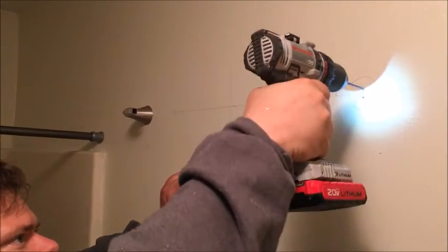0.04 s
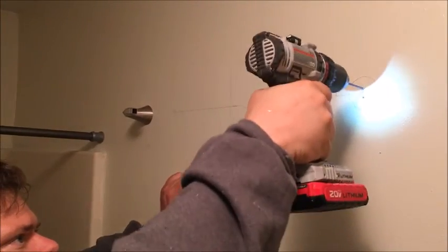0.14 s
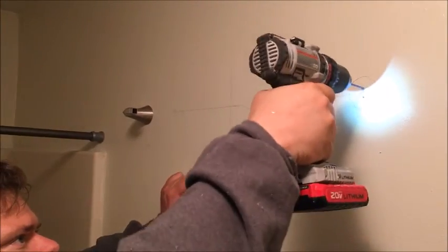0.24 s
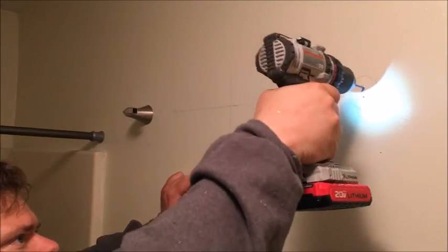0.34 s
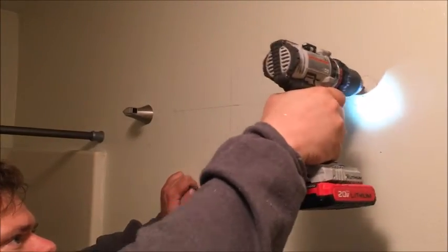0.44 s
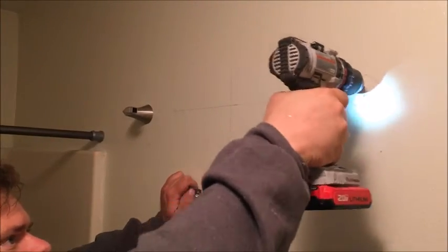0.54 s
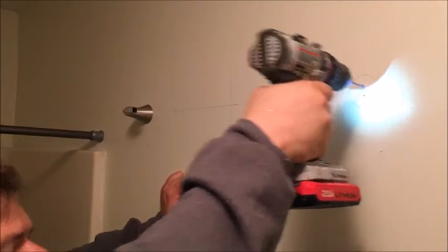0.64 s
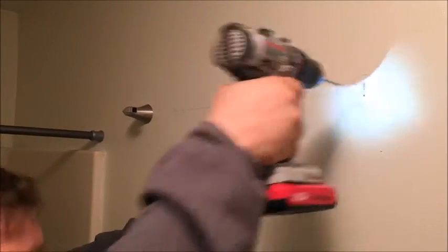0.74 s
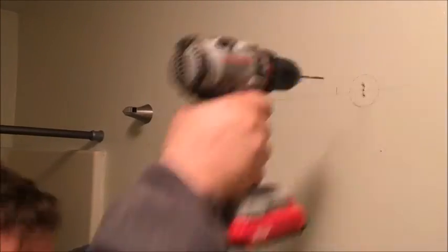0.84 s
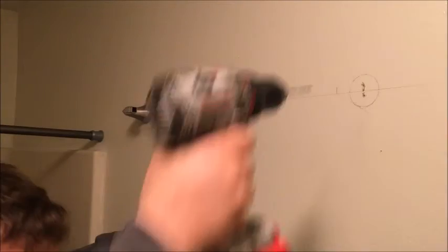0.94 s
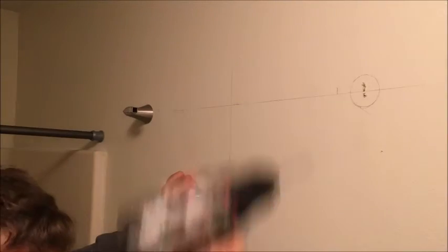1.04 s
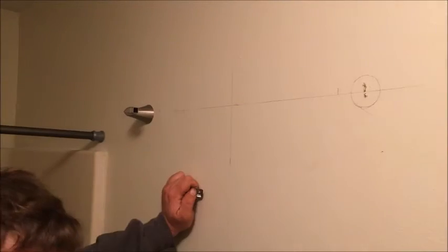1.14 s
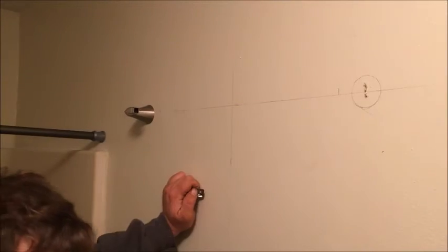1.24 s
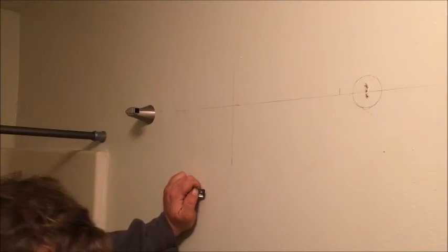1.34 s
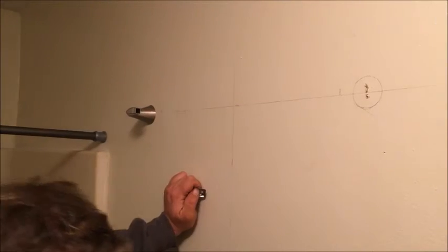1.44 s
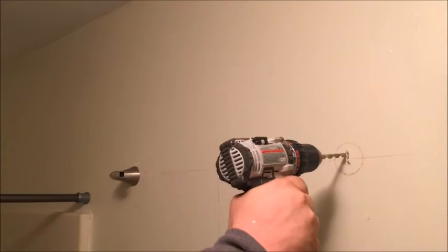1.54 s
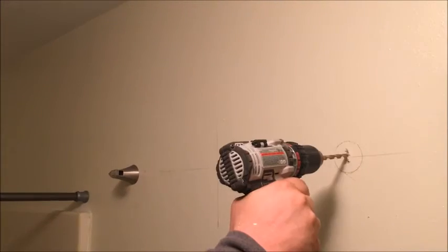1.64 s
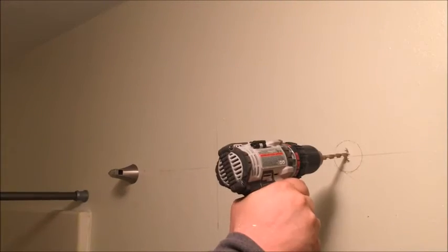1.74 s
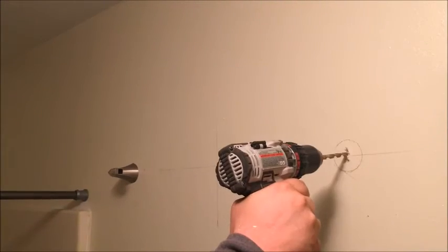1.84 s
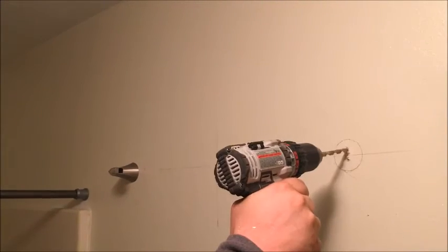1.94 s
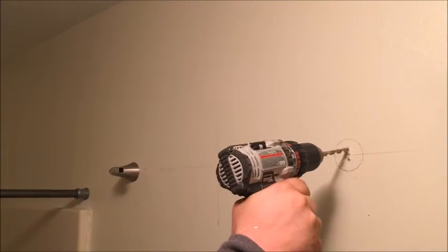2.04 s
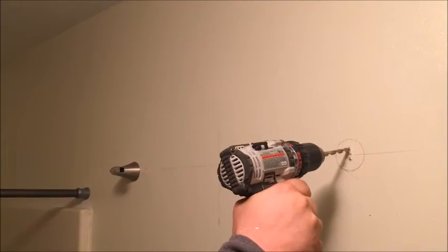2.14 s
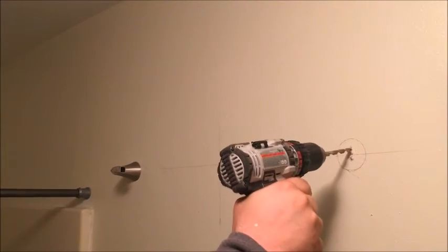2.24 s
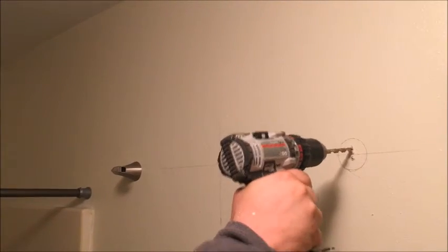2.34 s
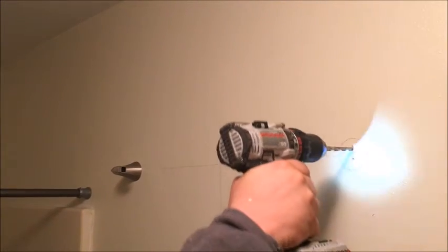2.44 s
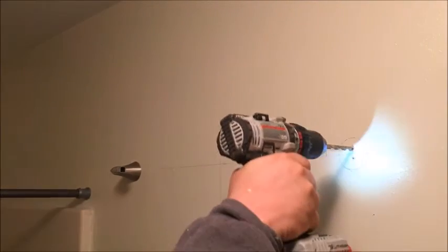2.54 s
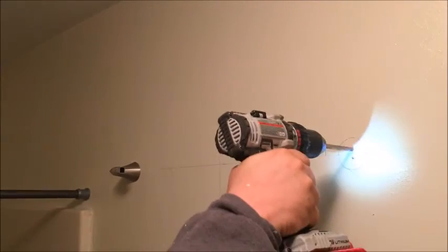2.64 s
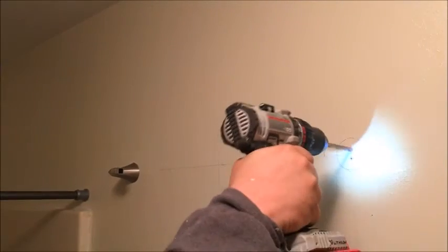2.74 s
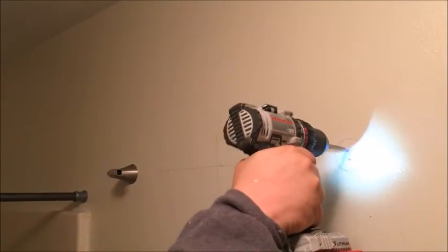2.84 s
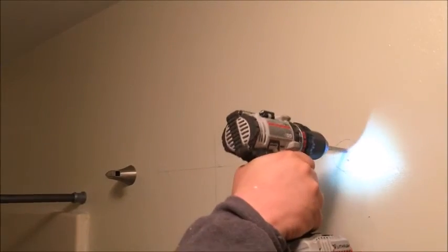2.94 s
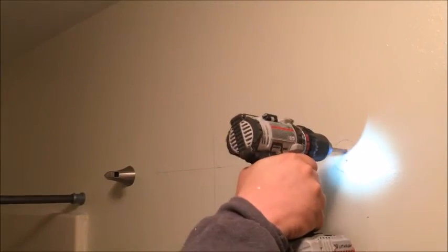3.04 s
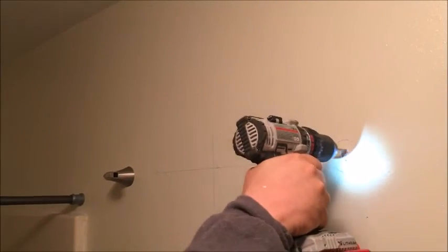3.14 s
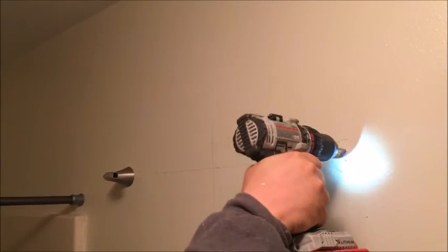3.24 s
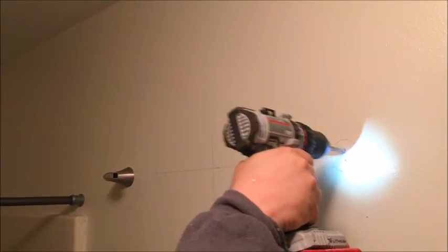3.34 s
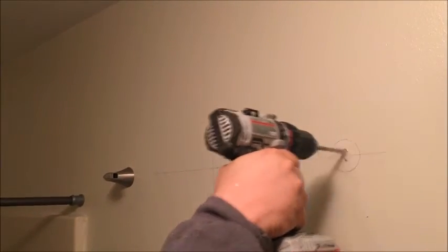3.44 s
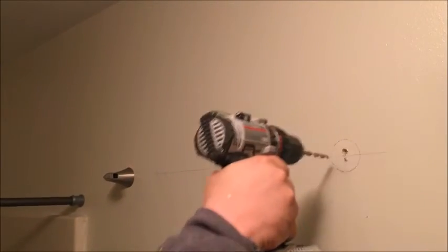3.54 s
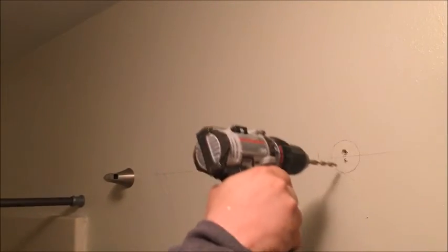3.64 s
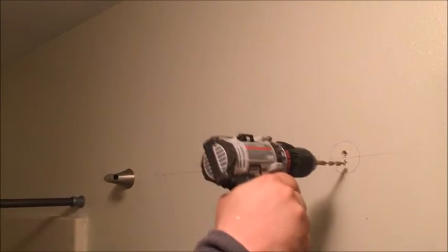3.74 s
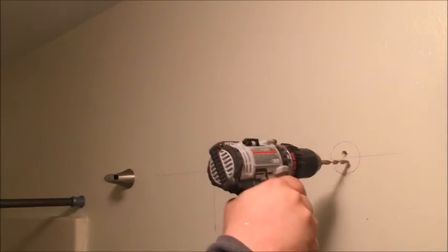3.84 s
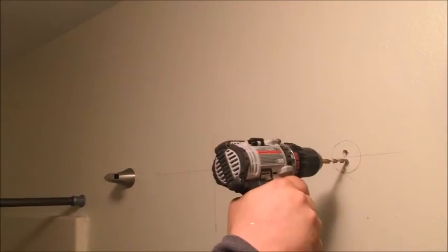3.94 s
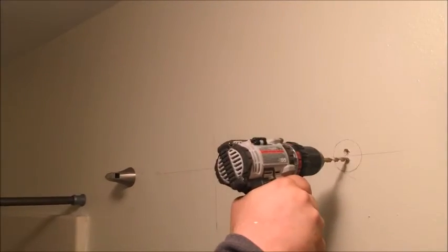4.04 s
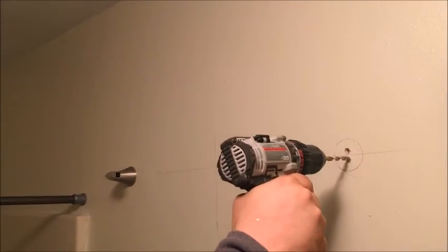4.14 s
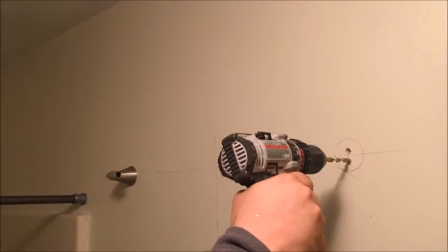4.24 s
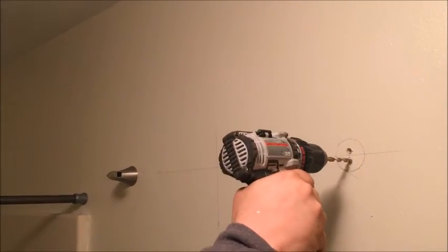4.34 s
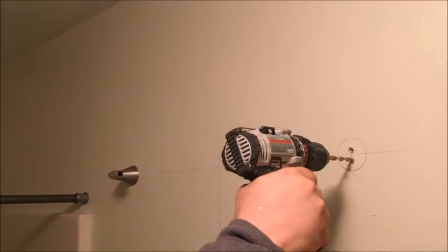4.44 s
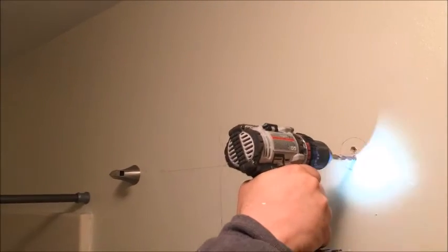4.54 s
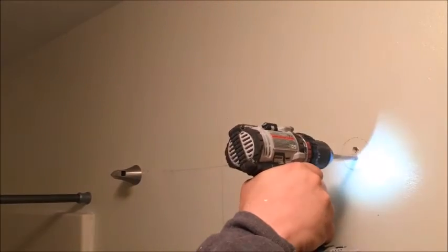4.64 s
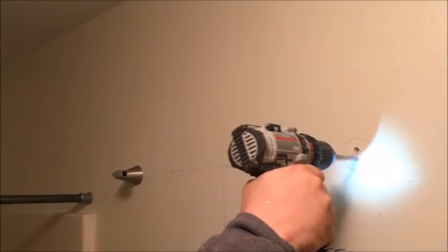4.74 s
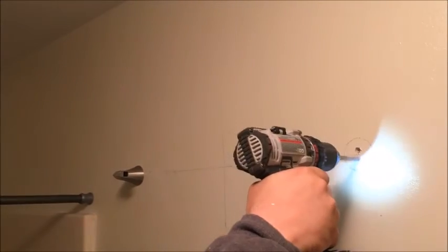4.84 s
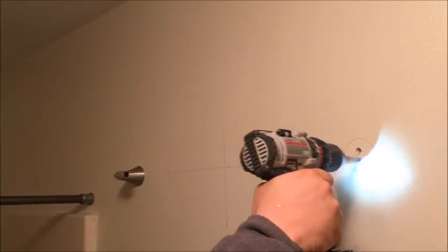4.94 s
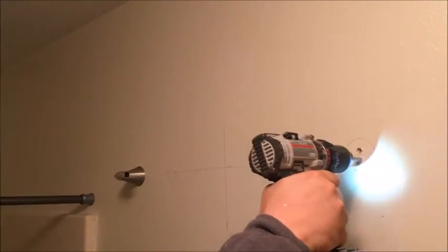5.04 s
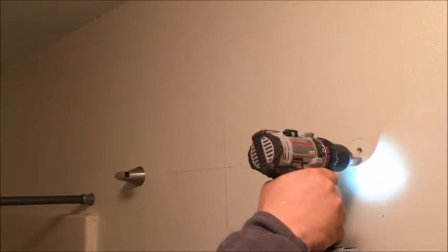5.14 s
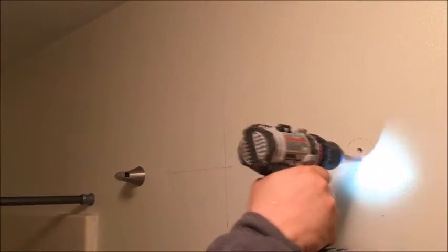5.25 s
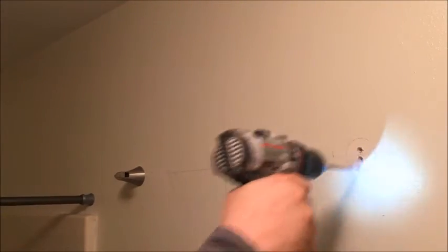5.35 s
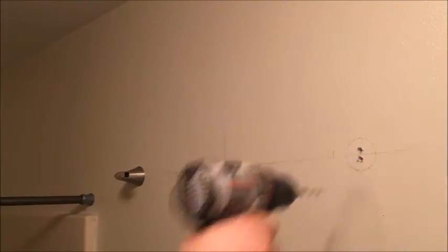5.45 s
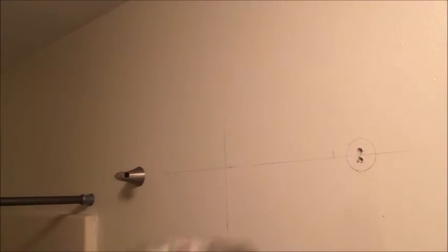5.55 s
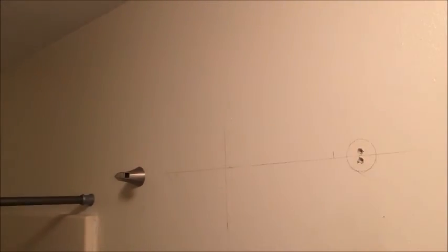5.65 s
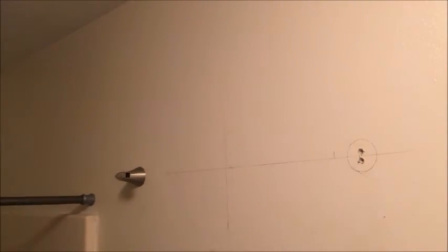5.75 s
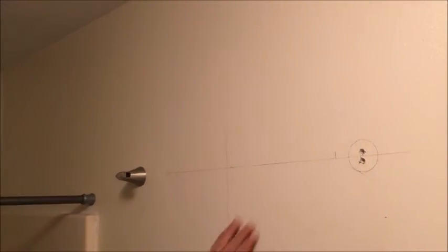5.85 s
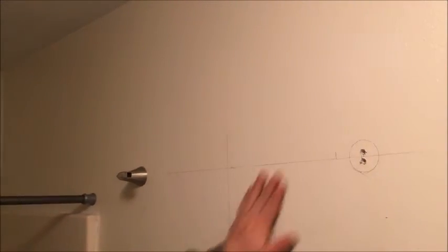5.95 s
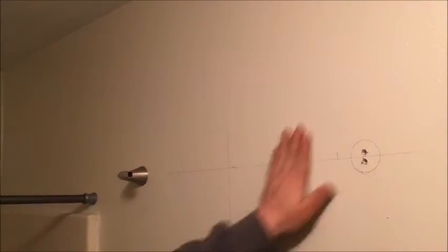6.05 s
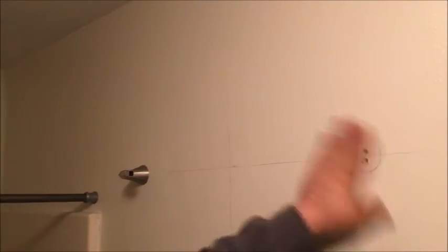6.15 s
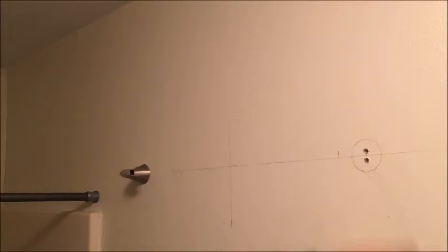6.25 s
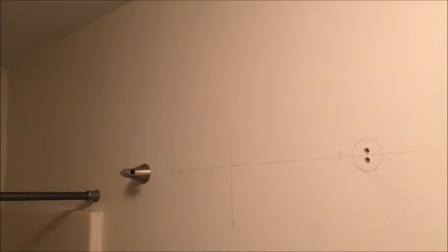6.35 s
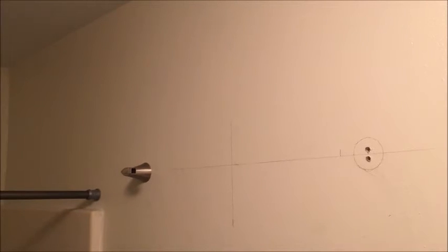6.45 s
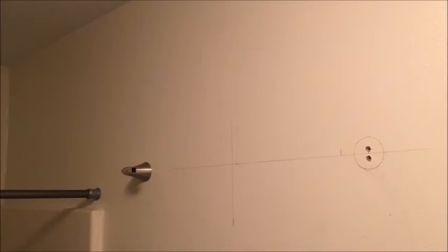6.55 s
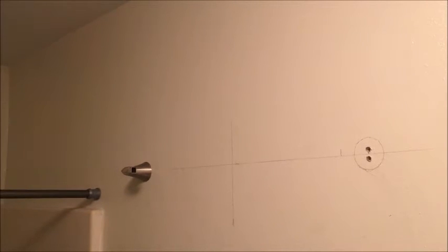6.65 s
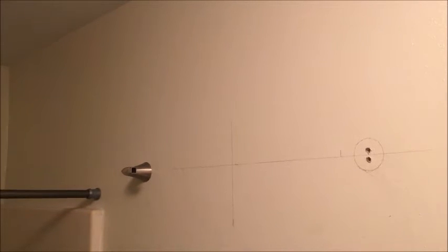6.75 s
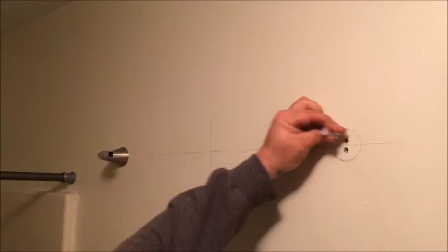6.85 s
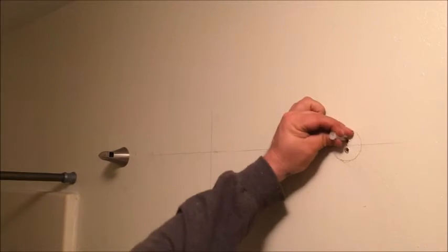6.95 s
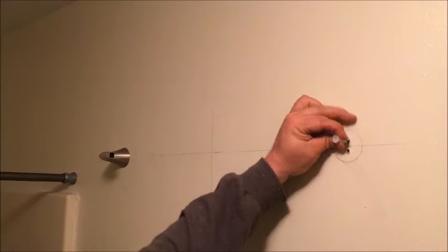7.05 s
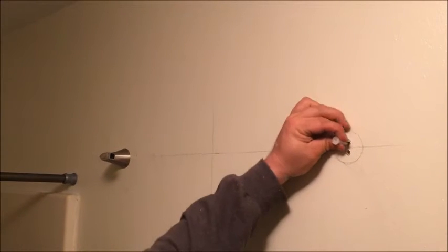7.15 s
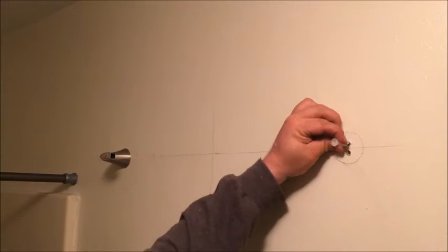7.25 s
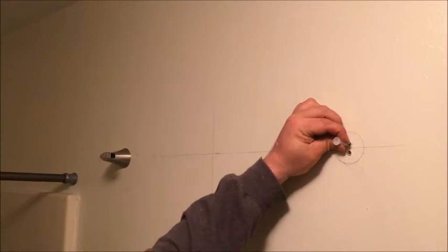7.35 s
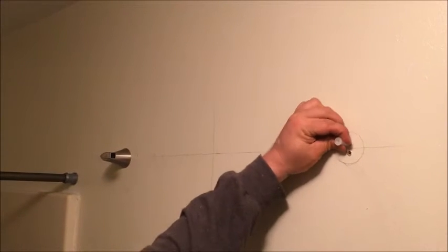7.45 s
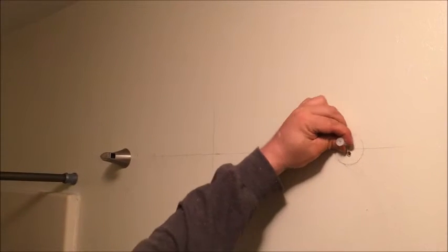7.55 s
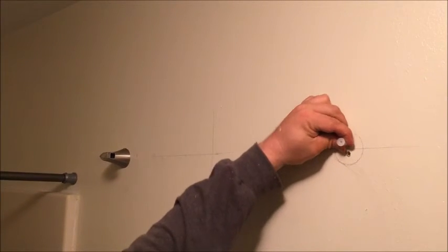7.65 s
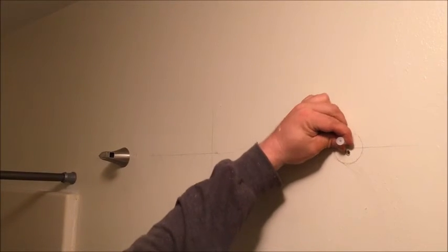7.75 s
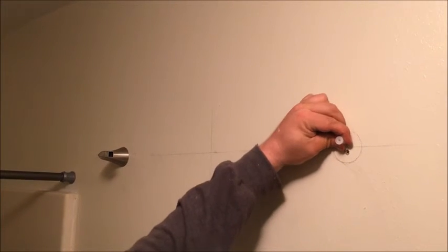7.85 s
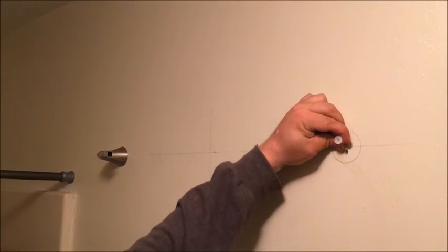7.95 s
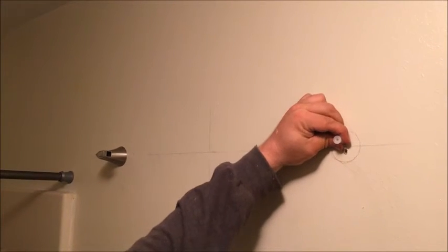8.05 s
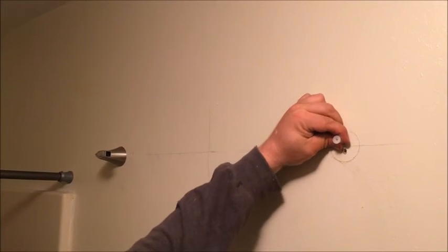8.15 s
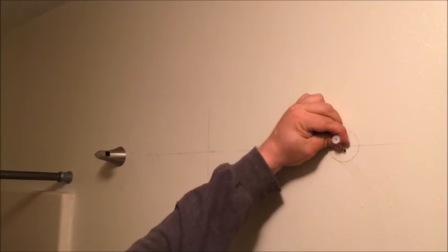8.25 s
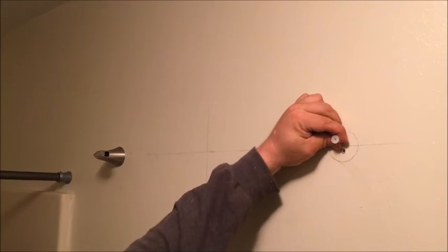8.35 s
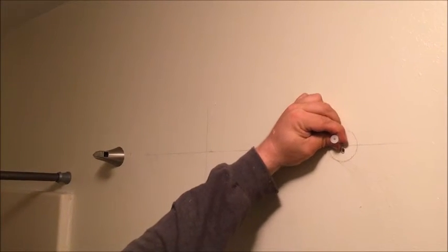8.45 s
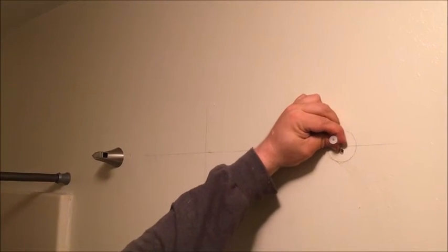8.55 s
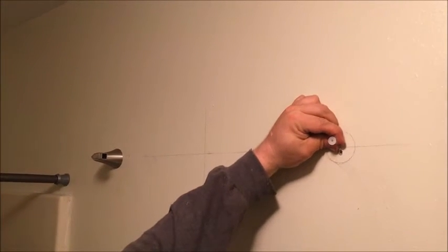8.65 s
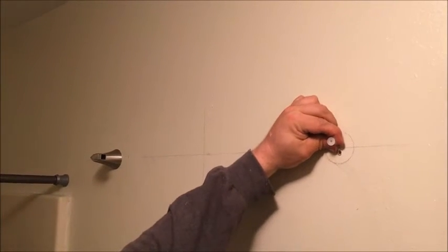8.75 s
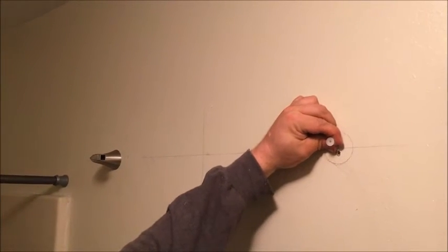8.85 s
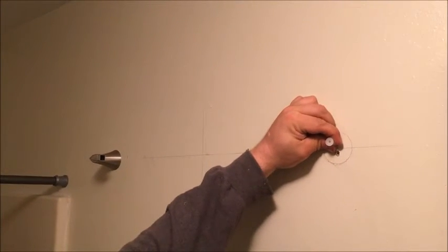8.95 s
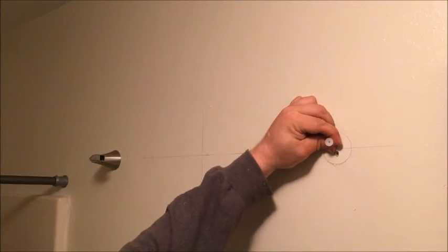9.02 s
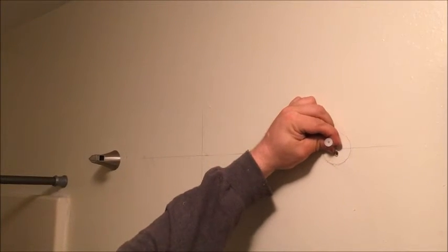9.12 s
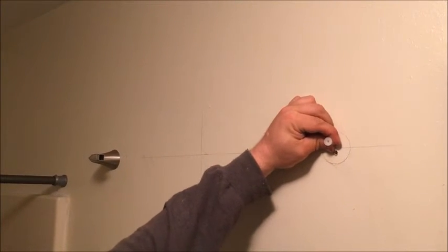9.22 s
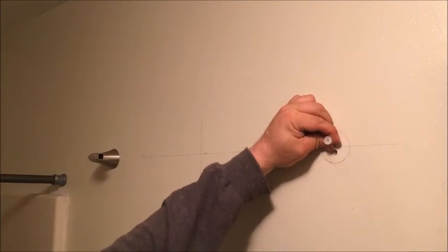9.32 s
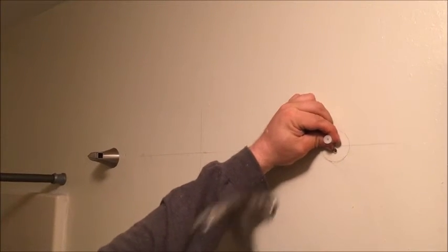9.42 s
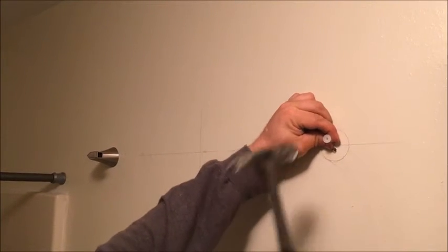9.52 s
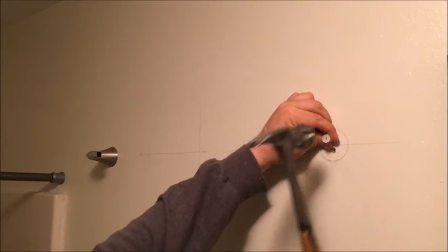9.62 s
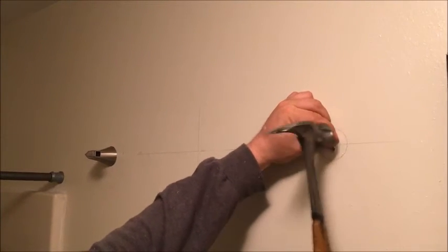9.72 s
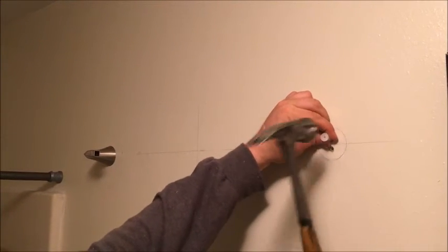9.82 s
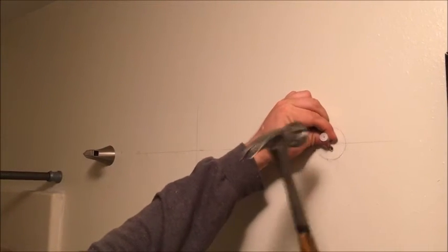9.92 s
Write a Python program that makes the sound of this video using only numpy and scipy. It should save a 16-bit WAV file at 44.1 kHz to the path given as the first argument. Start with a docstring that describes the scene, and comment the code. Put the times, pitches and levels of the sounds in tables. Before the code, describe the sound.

A cordless drill bores into hollow wall board for the first second, a wavering whine over gritty rasping, and stops with a clack of gears. The bit taps the wall lightly around 2 seconds. A second burst runs from 2.6 to 3.5 seconds, and after more faint taps a third from 4.7 to 5.5, both clacking at start and stop while the wall rumbles. Around 6 seconds a hand sweeps dust off the wall. The sound cuts out for an instant near 6.9. From 7 seconds fingers press in a plastic anchor with quiet rubs and dull bumps, a short squeak near 8 and a sharp click at 8.7. At 9.8 a hammer lands one loud blow that makes the wall boom. Everything sounds close, with the short echo of a small tiled bathroom over faint hiss and mains hum.

```python
"""A cordless drill bores three holes in hollow wall board in a small tiled bathroom.
Its tones follow the motor speed over the rasp of gears and bit; the gears clack at start and stop.
Between holes the bit taps the wall, a hand wipes the dust off and fingers press in a squeaking
plastic anchor; a hammer lands the first blow. The hollow wall booms under every touch.
Faint hiss and mains hum lie underneath; the sound cuts out once, briefly."""
import sys
import numpy as np
from scipy import signal
from scipy.fft import rfft, irfft, next_fast_len
from scipy.io import wavfile
from scipy.ndimage import uniform_filter1d

SR = 44100
rng = np.random.default_rng(int(sys.argv[2]) if len(sys.argv) > 2 else 0)


def int16_out(signal):
    """Quantize to a 16-bit WAV file."""
    q = np.round(np.clip(np.atleast_2d(signal).T, -1, 1) * 32767)
    wavfile.write(sys.argv[1], SR, q.astype(np.int16))


N = 440118
T = np.arange(N) / SR

# per hole: t/s, rasp level/dB, hiss/dB re rasp, growl/dB re rasp
BORING = [
    [(0.0, -28, -3.5, -16), (0.074, -28, -10.5, -17), (0.12, -26.5, 0, -11.5), (0.272, -22, -1.5, -12.5),
     (0.492, -24, -1.5, -15.5), (0.718, -25, 0, -15.5), (0.892, -24.5, -1, -21), (0.91, -18.5, 5.5, -17),
     (0.942, -17.5, -10, -18.5), (0.96, -18, -9.5, -13)],
    [(2.632, -17.5, -11.5, -5.5), (2.688, -25, -0.5, -8), (2.79, -21, -3, -2.5), (3.008, -24, -2, -12.5),
     (3.226, -23.5, -1.5, -12.5), (3.514, -23, -2, -12), (3.57, -25, -8, -3.5)],
    [(4.667, -17, -11, -15), (4.703, -22, -4.5, -7), (4.775, -22.5, 0, -3.5), (4.957, -23.5, -1.5, -10),
     (5.287, -23, -1, -12), (5.445, -24, -2, -8), (5.459, -19, 2, -21.5), (5.491, -16.5, -1, -20),
     (5.515, -29.5, -3, -14)],
]
RUMBLE_DB = (-9.5, -6, -5)  # per hole, re growl
def drill():
    """Three bursts of speed-locked tones over the rasp of gears and bit; returns (whine, grinding)."""
    whine, grinding = np.zeros((2, N))
    for hole, rows in enumerate(BORING):
        t, (rasp_db, hiss_db, growl_db) = curves(rows)
        turns, tone_gain = motor(t, hole)
        add(whine, t[0], motor_whine(t, turns, hole) * tone_gain)
        tones = gear_tones(turns) * tone_gain
        noise = rasp(turns, hiss_db, growl_db, RUMBLE_DB[hole])
        fade = np.minimum(1, np.minimum(t - t[0], rows[-1][0] - t) / .0043)
        add(grinding, t[0], gain_of(rasp_db - 3.5) * (noise + tones) * fade)
    return whine, grinding


# per hole: start/s, time constant/s, full speed/Hz, creep as the bit frees/(Hz/s), release/s, brake/s
MOTOR_RUNS = [(0.117, .051, 356.9, 13.0, 0.842, 0.915), (2.635, .052, 351.9, 11.5, 3.44, 3.535),
              (4.654, .040, 349.3, 15.0, 5.42, 5.465)]
def motor(t, hole):
    """The motor spins up, coasts on release and brakes; returns (turns, gain of its tones)."""
    start, lag, full_hz, creep, release, brake = MOTOR_RUNS[hole]
    coast_hz_per_s, knee_s = 560, .012
    spin_up = 1 - np.exp(-np.maximum(t - start, 0) / lag)
    coast_hz = coast_hz_per_s * knee_s * np.logaddexp(0, (t - release) / knee_s)
    speed_hz = full_hz * spin_up + creep * (t - start) - coast_hz
    deficit = np.clip(1 - speed_hz / full_hz, 0, 1)
    jitter = (.00021 + .03 * np.sqrt(deficit)) * drift(len(t), 150)
    turns = np.cumsum(speed_hz * (1 + jitter)) / SR
    gate = np.clip(np.minimum((spin_up - .7) / .07, (brake - t) / .015), 0, 1)  # 70 % speed to brake
    return turns, gate * gain_of(-22 * deficit)


# per hole, level/dB: commutator buzz, half the gear whine frequency, third buzz harmonic
BUZZ_DB = [(-37.5, -44, -40), (-39.5, -40.5, -40), (-41.5, -44, -42.5)]
# per hole: t/s, gear whine/dB, shaft hum/dB, hum octave/dB, buzz octave/dB
WHINE_LEVELS = [
    [(0.19, -35.5, -47.5, -50, -34.5), (0.258, -26, -47, -46, -30), (0.354, -20, -46.5, -33.5, -30),
     (0.406, -19, -54, -44.5, -34), (0.442, -21, -44.5, -46, -37.5), (0.516, -22.5, -39, -51, -37.5),
     (0.564, -16, -31, -42.5, -33), (0.698, -27.5, -46.5, -38.5, -37.5), (0.756, -21.5, -34, -39.5, -41.5),
     (0.824, -27, -47, -35.5, -36.5), (0.874, -23.5, -42.5, -46.5, -37.5),
     (0.915, -25.5, -55.5, -32.5, -28)],
    [(2.725, -30, -34.5, -49, -28.5), (2.771, -30, -53.5, -39, -32), (2.857, -22.5, -37.5, -44.5, -28),
     (2.893, -27, -41, -48, -34.5), (2.933, -19, -46.5, -44.5, -30), (2.979, -21.5, -40.5, -36.5, -30.5),
     (3.017, -30, -33, -47.5, -36), (3.143, -23, -55.5, -51, -30.5), (3.249, -20, -37.5, -48, -42),
     (3.315, -28.5, -46.5, -51, -55), (3.403, -21.5, -39, -37, -35), (3.535, -30, -41.5, -45, -41)],
    [(4.72, -29, -47.5, -42, -32), (4.808, -23, -44.5, -43, -24.5), (4.868, -28.5, -44.5, -44.5, -33.5),
     (4.938, -21, -33.5, -36.5, -32.5), (4.998, -26, -51.5, -50, -27), (5.024, -36.5, -41.5, -47, -32.5),
     (5.082, -21.5, -47.5, -51, -42.5), (5.19, -35, -37, -55, -46.5), (5.27, -14.5, -40.5, -44, -36.5),
     (5.32, -28, -40, -41, -33), (5.422, -22, -51, -43.5, -54), (5.465, -39.5, -41, -35, -13.5)],
]
BUZZ_ORDERS, WHINE_ORDERS = (5, 9, 15), (18, 1, 2, 10)  # multiples of motor speed, by column
WHINE_FLUTTER_DB = (2.4, 4.5, 4.5, 3.2)
def motor_whine(t, turns, hole):
    """Commutator, shaft and gears sound at multiples of the motor speed, each wavering in level."""
    out = np.zeros(len(t))
    for order, db in zip(BUZZ_ORDERS, BUZZ_DB[hole]):
        waver_db = 2.5 * drift(len(t), 14) + 3 * drift(len(t), 60)
        out += gain_of(db + waver_db) * np.sin(2 * np.pi * order * turns)
    times, *levels = np.concatenate(WHINE_LEVELS).T
    for order, db, flutter_db in zip(WHINE_ORDERS, levels, WHINE_FLUTTER_DB):
        level_db = np.interp(t, times, db) + flutter_db * drift(len(t), 80)
        out += gain_of(level_db) * np.sin(2 * np.pi * order * turns)
    return np.sqrt(2) * out


# multiple of motor speed, level/dB re rasp
GEAR_ORDERS = [(4, -22), (6, -22), (12, -18.5), (13, -21.5), (16, -18.5), (20, -14.5), (25, -15),
               (30, -22.5), (36, -14), (40, -18.5)]
def gear_tones(turns):
    """Weaker motor and gear tones swell at random; orders 3 to 14 also sound as rough lines."""
    def tone(order):
        return np.sin(2 * np.pi * (order * turns + rng.random()))
    swells_db = [3 * drift(len(turns), 25) for _ in GEAR_ORDERS]
    smooth = sum(gain_of(db + swell) * tone(order) for (order, db), swell in zip(GEAR_ORDERS, swells_db))
    rough = sum(drift(len(turns), 70) * tone(order) for order in range(3, 15))
    return smooth + gain_of(-17) * rough


# f/Hz, density/dB
RASP_SPECTRUM = [(71, -34.5), (120, -5), (241, -3.5), (355, 1), (454, -5.5), (712, -1.5), (805, -6),
                 (1750, -4.5), (2810, -5.5), (3240, 5), (4880, -2), (6370, -2), (7820, -14.5), (9210, -25),
                 (16000, -24.5)]
# f/Hz, width/Hz, level/dB
HOUSING_MODES = [(630, 70, -13), (1700, 360, 1.5), (2260, 540, 2.5), (3388, 220, -4.5), (5530, 120, -2.5),
                 (8940, 310, -4.5)]
def rasp(turns, hiss_db, growl_db, rumble_db):
    """Uneven grit throbs once a turn and rings the housing; air hisses and the board rumbles."""
    n = len(turns)
    grit = grains(n, 2.5, 900) * (1 + .3 * np.cos(2 * np.pi * turns))
    noise = unit_rms(coloured(grit, RASP_SPECTRUM)) + gain_of(-4) * ring_modes(grit, HOUSING_MODES)
    hiss = gain_of(hiss_db) * unit_rms(band(noise, 7200, 14000))
    growl = gain_of(growl_db) * unit_rms(band(noise, 140, 820))
    rumble = gain_of(growl_db + rumble_db + 2.5 * drift(n, 18)) * unit_rms(band(noise, 120, 210))
    return unit_rms(band(noise, 750, 8700)) + hiss + growl + rumble


# t/s, snap level/dB, ring f/Hz, ring level/dB
GEAR_CLACKS = [(0.908, -6.5, 1470, -19), (0.918, 5, 2020, -20), (0.937, 1.5, 1890, -12.5),
               (0.94, -6.5, 1850, -17), (0.952, -12, 1887, -22.5), (2.633, -7, 1642, -14),
               (2.643, -11, 1680, -19), (3.526, -2, 2270, -22.5), (3.543, 4, 1685, -19.5),
               (3.556, -6, 1700, -27), (4.666, -2, 1600, -20), (4.676, 1.5, 2120, -19.5),
               (5.455, -5, 2400, -32), (5.468, -9, 1980, -18), (5.484, 6, 1790, -31),
               (5.498, -13, 1560, -27)]
def gear_clacks():
    """Gears take up slack at start and stop: a snap that rattles on and rings the housing."""
    out, t = np.zeros(N), np.arange(3000) / SR
    envelope = (decay(t, .024) + gain_of(-10) * decay(t, .12)) * (1 - np.exp(-t / .00011))
    for start, db, hz, ring_db in GEAR_CLACKS:
        noise = rng.standard_normal(len(t))
        snap = coloured(noise * envelope, [(300, -18.5), (900, 2), (7000, -3.5), (16000, -11.5)])
        ring = unit_rms(resonate(resonate(noise, hz, 400), hz, 400)) * decay(t, .071)
        add(out, start, gain_of(db - 11.5) * snap + gain_of(ring_db - 1.5) * ring)
    return out


# t/s, length/s, first f/Hz, last f/Hz, level/dB
CHIRPS = [(0.022, 0.088, 580, 978, -32.5), (0.143, 0.082, 4090, 4570, -32.5),
          (0.205, 0.038, 3450, 3470, -30), (0.616, 0.014, 4800, 4550, -21),
          (0.643, 0.026, 9000, 9850, -16.5)]
# t/s, level/dB
BRAKE_BITES = [(0.9043, -15.5), (3.5184, -14), (5.456, -16.5)]
def squeals():
    """Motor and bit chirp in short glides; the brake bites with a falling squeal."""
    out = np.zeros(N)
    brakes = [(start, .015, 10100, 7400, db - 7) for start, db in BRAKE_BITES]
    for start, length, first_hz, last_hz, db in CHIRPS + brakes:
        n = int(length * SR)
        hz = np.geomspace(first_hz, last_hz, n) * (1 + .0022 * drift(n, 730))
        add(out, start, gain_of(db) * np.sin(2 * np.pi * np.cumsum(hz) / SR) * signal.windows.tukey(n, .5))
    return out


# t/s, level/dB, treble/dB re level, ring f/Hz, ring/dB re snap, boom/dB, shudder/dB
WALL_TAPS = [(1.751, -38, -26, 580, 4, -20.5, -37.5), (2.129, -43.5, -22, 639, 0, -25, -62),
             (2.268, -56.5, -26.5, 1005, 11, -47, -68), (4.254, -43, -25, 1100, 22, -54.5, -56),
             (4.339, -53, -30, 1614, 7.5, -51, -54), (4.568, -46, -5, 1575, 2, -41, -73),
             (6.258, -34, -20, 2820, 3, -32.5, -33), (6.832, -31.5, -5.5, 559, 8, -68, -61),
             (6.975, -51, -6, 1425, 9, -42, -55), (7.016, -52, -18.5, 611, -3, -38, -59),
             (7.122, -51, -23, 646, 5, -45, -55), (7.151, -38, -24, 657, 7, -44, -62),
             (7.219, -45, -29, 660, 0, -44, -64), (7.323, -37.5, -29, 501, 26, -39, -45),
             (7.67, -37.5, -22, 581, 14, -50, -41), (7.707, -37.5, -22, 513, 2.5, -30.5, -40),
             (8.09, -58, -21, 597, 0, -63, -50), (8.203, -45, -14, 1550, 11, -65, -71),
             (8.737, -22, -7.5, 2764, 4, -52, -36.5), (9.018, -47.5, -25, 2115, 17, -69, -68),
             (9.529, -61, -25, 656, 16, -64, -65.5), (9.572, -51, -30, 670, 22, -67, -53.5),
             (9.825, -17.5, -16.5, 1150, -8, -2, -20)]
def taps():
    """Each tap snaps, shudders the board's dense modes and booms the wall; returns (snaps, booms)."""
    snaps, booms = np.zeros((2, N))
    t = np.arange(SR // 3) / SR
    boom = wall_boom(t)
    for start, db, treble_db, hz, ring_db, boom_db, shudder_db in WALL_TAPS:
        noise = rng.standard_normal(len(t))
        add(snaps, start, gain_of(db) * contact_snap(t, noise, treble_db, hz, ring_db))
        shudder = unit_rms(coloured(noise, [(90, -29), (150, 14), (600, 2), (1500, -30.5), (5000, -71)]))
        add(booms, start, gain_of(shudder_db) * shudder * decay(t, .22) * (1 - np.exp(-t / .0033)))
        swing = gain_of(boom_db + 4) * boom
        swing += .63 * band(swing ** 2, 98, 2020)  # a large swing is lopsided
        add(booms, start + .0035, swing)
    return snaps, booms


def contact_snap(t, noise, treble_db, ring_hz, ring_db):
    """A hard contact: a sharp burst of noise with a short ring and a faint tail."""
    envelope = np.exp(-t / .0015) + gain_of(-9.5) * decay(t, .19) + gain_of(-29) * decay(t, .5)
    hit = noise * envelope * (1 - np.exp(-t / .00047))
    body = coloured(band(hit, 160, 5600), [(250, -3), (1300, 2.5), (1900, -.5), (3800, -5.5), (6000, -13)])
    body += gain_of(ring_db) * resonate(hit, ring_hz, 110)
    treble = coloured(band(hit, 6300, 24000), [(5000, 7.5), (16000, -3)])
    return body / np.abs(body).max() + gain_of(treble_db) * treble


# f/Hz, level/dB, t60/s
WALL_MODES = [(69.6, 6.5, 0.28), (79.03, 3, 0.33), (89.5, -6.5, 0.058), (144.5, -17, 0.25),
              (218, -29, 0.23), (301.5, -21.5, 0.26), (359, -23.5, 0.41), (415, -33.5, 0.53),
              (490, -37, .25), (537, -34.5, 0.22), (622, -37, 0.45), (840, -38, .25), (915, -32.5, 0.14),
              (1173, -37.5, .3), (1260, -36.5, .25)]
def wall_boom(t):
    """The pushed hollow wall swings up over a cycle, then its modes ring down."""
    boom = sum(gain_of(db) * decay(t, t60) * np.sin(2 * np.pi * hz * t) for hz, db, t60 in WALL_MODES)
    boom *= -(1 - np.exp(-t / .0044)) ** 2
    return boom / np.abs(boom).max()


def shaken_wall():
    """Uneven force keeps the four lowest wall modes swinging, with denser modes above."""
    force = rng.standard_normal(N)
    swing = sum(gain_of(db) * unit_rms(resonate(resonate(force, hz, 1.7 / t60), hz, 26))
                for hz, db, t60 in WALL_MODES[:4])
    swing += gain_of(-15) * unit_rms(band(force, 83, 250))
    envelope = np.sqrt(uniform_filter1d(swing ** 2, 1500)) + .15
    return wall_pressure() * unit_rms(swing / envelope ** .34)


# t/s, level/dB, hold/s
WALL_SHOVES = [(0.116, -35.5, .01), (0.27, -31.5, 0.016), (0.348, -31.5, 0.0065), (0.43, -32, 0.12),
               (0.692, -26.5, 0.07), (2.34, -44.5, .01), (2.51, -45, .1), (2.67, -33, 0.027),
               (2.74, -18.5, 0.018), (2.82, -21, .01), (3.03, -24.5, 0.029), (3.16, -29, 0.022),
               (3.26, -34, 0.0091), (3.42, -23.5, 0.02), (4.129, -42, .02), (4.3, -44.5, 0.019),
               (4.591, -45, 0.011), (4.69, -29.5, .03), (4.78, -23, 0.015), (4.9, -32, 0.043),
               (5.11, -33, .01), (5.21, -32, .01), (5.32, -28, .01), (5.4, -28, 0.0075), (5.8, -44, 0.0062),
               (6.11, -47, .02), (6.26, -40, .02), (6.34, -46, 0.018), (6.51, -60, .02), (7.05, -36.5, .01),
               (7.19, -43, .01), (7.34, -40, 0.032), (7.51, -30.5, 0.009), (7.69, -35.5, 0.1),
               (7.88, -47.5, 0.2), (8.45, -52, 0.0095), (8.76, -46.5, .01)]
BORING_DB, REST_DB = (-42.5, -32, -38), -63.5
RISE_DB_PER_S, FALL_DB_PER_S = 299, 219.5
def wall_pressure():
    """How hard the wall shakes: at rest, under the boring bit and at each shove of bit or hand."""
    t = T[::100]
    spans = [(start, start + hold, db) for start, db, hold in WALL_SHOVES]
    spans += [(rows[0][0] + .072, rows[-1][0] - .08, db) for rows, db in zip(BORING, BORING_DB)]
    power = gain_of(REST_DB) ** 2
    for start, end, db in spans:
        drop_db = RISE_DB_PER_S * np.maximum(start - t, 0) + FALL_DB_PER_S * np.maximum(t - end, 0)
        power += gain_of(db - drop_db) ** 2
    return np.interp(T, t, np.sqrt(power))


# start/s, peak/s, end/s, level/dB, treble/dB re scrape, low mids/dB re scrape, scrape f/Hz
SMALL_RUBS = [(2.262, 2.291, 2.35, -60, -17.5, -2, 1668), (2.349, 2.415, 2.6, -58.5, -20, 2, 1736),
              (2.443, 2.491, 2.58, -62, -14.5, 8.5, 1508), (2.5, 2.597, 2.632, -55.5, -10, -3, 1690),
              (4.25, 4.34, 4.41, -66, -14.5, 10.5, 1770), (4.551, 4.577, 4.64, -55.5, -8.5, -11, 1850),
              (6.823, 6.845, 6.91, -48, -3, 2, 1300), (6.949, 7.03, 7.13, -60, -2, -7.5, 1750),
              (7.101, 7.147, 7.21, -48.5, -7.5, 3.5, 1810), (7.192, 7.253, 7.37, -48.5, -19, 7.5, 1690),
              (7.301, 7.56, 7.72, -49.5, -9, -1, 1690), (7.602, 7.794, 7.95, -49.5, -10.5, 0.5, 2040),
              (7.782, 7.949, 8.07, -37.5, -5, -9.5, 2360), (8.001, 8.154, 8.35, -56.5, -6.5, -3, 1550),
              (8.145, 8.382, 8.62, -56, -11, -3, 1620), (8.54, 8.689, 8.74, -63.5, 3, -13, 1960),
              (8.804, 8.905, 9.05, -53.5, -5, -4.5, 1780), (8.899, 9.046, 9.22, -54.5, -2.5, -11, 2270),
              (9.25, 9.349, 9.45, -65.5, -9, -8.5, 1790), (9.423, 9.565, 9.68, -70, -4, 12.5, 1700),
              (9.66, 9.718, 9.79, -62, -13, -17, 1970)]
# t/s, level/dB, treble/dB re scrape, low mids/dB re scrape, scrape f/Hz
DUST_WIPE = [(5.75, -49, -8, -3.5, 1970), (5.918, -41.5, -5.5, -14, 2270), (6.008, -36.5, -7, -14.5, 1910),
             (6.186, -31.5, -8, -14.5, 2120), (6.284, -23.5, -3.5, -10.5, 2060),
             (6.414, -36.5, 3, -7.5, 2480), (6.46, -49.5, 0, 0, 2230), (6.58, -71, -4.5, -7, 2010),
             (6.75, -70, -4, -9, 1854)]
def hand_rubs():
    """Small rubs of skin, sleeve and plastic swell and fade; a hand sweeps the wall."""
    out = np.zeros(N)
    for start, peak, end, db, *colour in SMALL_RUBS:
        add(out, start, friction([(start, db - 17, *colour), (peak, db, *colour), (end, db - 17, *colour)]))
    add(out, DUST_WIPE[0][0], friction(DUST_WIPE))
    return out


def friction(rows):
    """Fine friction grains: a scrape band with hiss above and a dull brush below."""
    t, (db, treble_db, low_db, hz) = curves(rows)
    grit = grains(len(t), 2.1, 400)
    scrape = unit_rms(unit_rms(band(grit, 950, 4400)) + .89 * unit_rms(resonate(grit, hz, 600)))
    hiss = unit_rms(coloured(band(grit, 4400, 25000), [(4800, .5), (16000, -18)]))
    brush = unit_rms(band(grit, 170, 880))
    mix = scrape + gain_of(treble_db) * hiss + gain_of(low_db) * brush
    return gain_of(db - 6.5) * mix * signal.windows.tukey(len(t), .05)


# t/s, level/dB
ANCHOR_TWIST = [(7.8, -64), (7.844, -68), (7.858, -60), (7.94, -47), (7.95, -28), (8.076, -71),
                (8.121, -64)]
# f/Hz, width/Hz, level/dB
ANCHOR_MODES = [(3510, 120, -2.5), (6440, 120, -5), (8000, 170, -0.5), (12000, 100, -6), (12300, 100, -6)]
def anchor_squeak():
    """Fast stick-slip of plastic on gypsum rings the anchor as it is twisted in."""
    out = np.zeros(N)
    t, (db,) = curves(ANCHOR_TWIST)
    squeak = ring_modes(grains(len(t), 6.2, 207.7), ANCHOR_MODES)
    add(out, t[0], gain_of(db - 10) * squeak * signal.windows.tukey(len(t), .2))
    return out


# f/Hz, t60/s
TILE_DECAY = [(100, .25), (260, 0.31), (700, .36), (1840, 0.25), (4850, 0.23), (12800, .18)]
def bathroom(x):
    """Sparse echoes of random sign, each band dying at its own rate; the next room lingers faintly."""
    echoes = np.zeros(SR)
    slots = np.arange(120, SR - 20, 12)
    echoes[slots + rng.integers(0, 12, len(slots))] = rng.choice([-1., 1.], len(slots))
    hz, t, spectra = signal.stft(echoes, SR, nperseg=256)
    band_hz, t60 = np.transpose(TILE_DECAY)
    fall_db = -60 * t / np.interp(np.log(hz + 1), np.log(band_hz), t60)[:, None]
    next_room = gain_of(-20.5 + .25 * fall_db)
    tail = signal.istft(spectra * (gain_of(fall_db) + next_room), SR, nperseg=256)[1]
    return signal.fftconvolve(x, tail / np.linalg.norm(tail))[:N]


# f/Hz, density/dB
AIR_SPECTRUM = [(15, -34.5), (25, -9), (53, -4.5), (84, 1), (134, -12), (175, -23), (229, -14.5),
                (531, -23.5), (2410, -28), (2910, -36.5), (4250, -34.5), (12900, -41.5), (16000, -50)]
# f/Hz, rms level/dB
MAINS_HUM = [(60, -71.5), (120, -67)]
CUT_START_S, CUT_END_S = 6.884, 6.913
def still_air():
    """Room and microphone hiss with faint mains hum; the hiss is fainter before the cut-out."""
    hum = sum(np.sqrt(2) * gain_of(db) * np.sin(2 * np.pi * hz * T) for hz, db in MAINS_HUM)
    air = unit_rms(coloured(rng.standard_normal(N), AIR_SPECTRUM))
    low = band(air, 12, 300)
    hiss = (air - low) * np.where(T < CUT_START_S, gain_of(-3.5), 1)
    return gain_of(-58.5 + .63 * drift(N, 20)) * (low + hiss) + hum


def gain_of(db):
    """dB to gain."""
    return 10 ** (np.asarray(db) / 20)


def decay(t, t60):
    """Falls 60 dB in t60 seconds."""
    return gain_of(-60 * t / t60)


def unit_rms(x):
    """Scales to rms 1."""
    return x / np.sqrt(np.mean(x ** 2) + 1e-20)


def add(mix, start_s, sound):
    """Mixes a sound in at start_s."""
    part = mix[round(start_s * SR):][:len(sound)]
    part += sound[:len(part)]


def curves(rows):
    """Interpolates (t/s, values...) rows per sample; returns (t, columns)."""
    times, *columns = np.transpose(rows)
    t = np.arange(times[0], times[-1], 1 / SR)
    return t, [np.interp(t, times, column) for column in columns]


def coloured(x, points):
    """Filters by a (f/Hz, level/dB) spectrum."""
    hz, db = np.transpose(points)
    size = next_fast_len(len(x), True)
    f = np.fft.rfftfreq(size, 1 / SR)
    return irfft(rfft(x, size) * gain_of(np.interp(np.log(f + 1), np.log(hz + 1), db)), size)[:len(x)]


def band(x, low_hz, high_hz):
    """Band-pass."""
    sos = signal.butter(3, [low_hz, min(high_hz, .45 * SR)], "bandpass", fs=SR, output="sos")
    return signal.sosfilt(sos, x)


def resonate(x, hz, width_hz):
    """Unity-gain resonance, steady or gliding: shift hz to zero, smooth, shift back."""
    carrier = np.exp(2j * np.pi * np.cumsum(hz * np.ones(len(x))) / SR)
    pole = np.exp(-np.pi * width_hz / SR)
    return 2 * (carrier * signal.lfilter([1 - pole], [1, -pole], x * carrier.conj() + 1e-18)).real


def ring_modes(x, modes):
    """Drives (f/Hz, width/Hz, level/dB) resonances; rms 1."""
    return unit_rms(sum(gain_of(db) * unit_rms(resonate(x, hz, width)) for hz, width, db in modes))


def drift(n, per_s):
    """Random curve through per_s unit-normal knots a second."""
    knots = rng.standard_normal(int(n / SR * per_s) + 2)
    return np.interp(np.arange(n) / SR * per_s, np.arange(len(knots)), knots)


def grains(n, depth_db, per_s):
    """Noise with a randomly flickering level."""
    return rng.standard_normal(n) * gain_of(depth_db * drift(n, per_s))


def scene():
    """Drill, taps and rubbing in the room, over the shaking wall and the still air."""
    whine, grinding = drill()
    rubbing = hand_rubs() + anchor_squeak()
    snaps, booms = taps()
    gears = gear_clacks() + squeals()
    direct = whine + grinding + gears + snaps + rubbing + booms
    room_send = gain_of(-12) * (whine + snaps) + gain_of(-7.5) * grinding + gain_of(-5) * gears
    room_send += gain_of(-5.5) * rubbing + gain_of(-10.5) * booms
    return (direct + bathroom(room_send) + shaken_wall() + still_air())[None]


def record(dry):
    """Microphone bass roll-off, soft overload on the loudest blow, a brief cut-out, band limit."""
    ceiling, edge_hz = 1.25, 15900
    thin = signal.sosfilt(signal.butter(2, 45., "highpass", fs=SR, output="sos"), dry)
    gate = np.clip(np.maximum(CUT_START_S - T, T - CUT_END_S) / .011, 0, 1)
    limited = ceiling * np.tanh(thin / ceiling) * gate
    lowpass = signal.firwin(511, edge_hz, window=("kaiser", 9), fs=SR)
    return signal.oaconvolve(limited, lowpass[None], "same")


dry = scene()
out = record(dry)
int16_out(out)
```